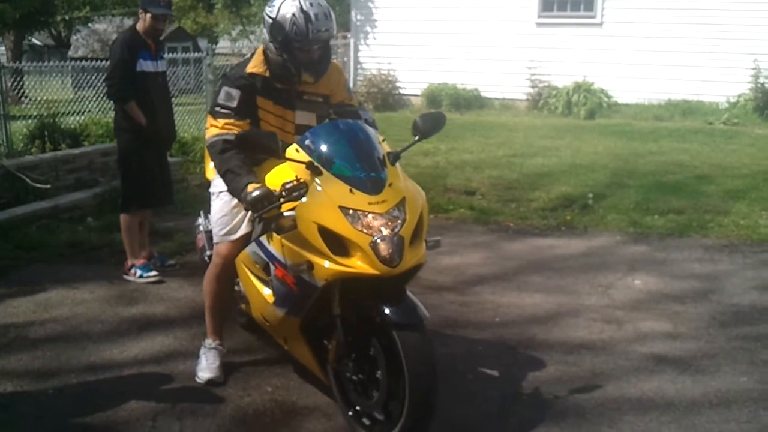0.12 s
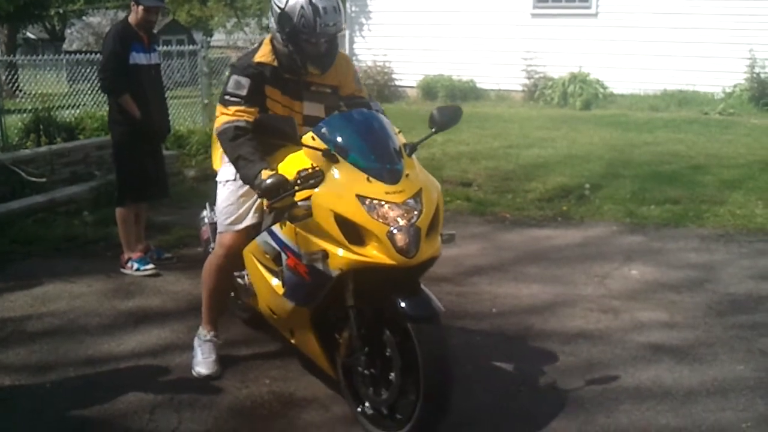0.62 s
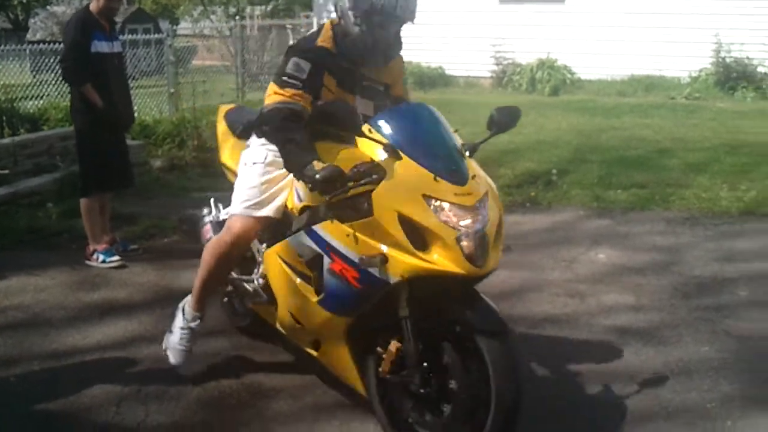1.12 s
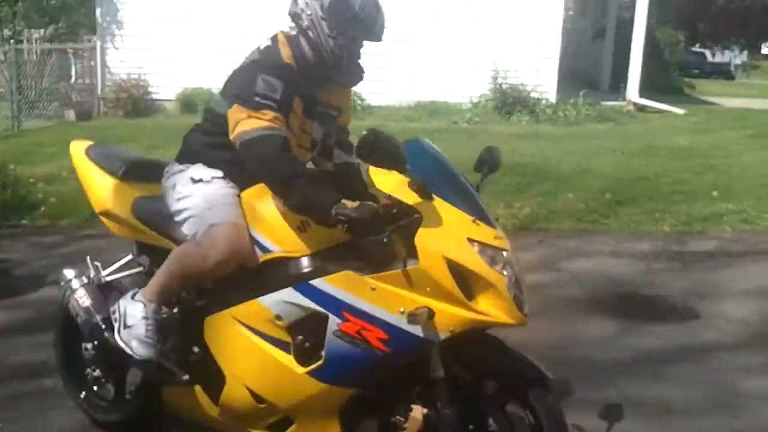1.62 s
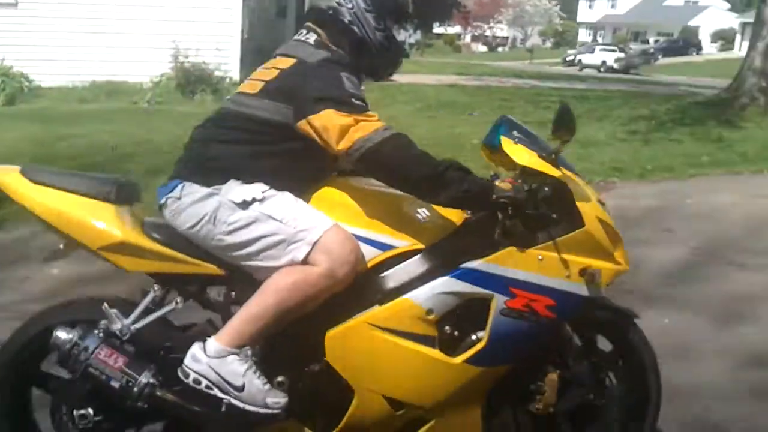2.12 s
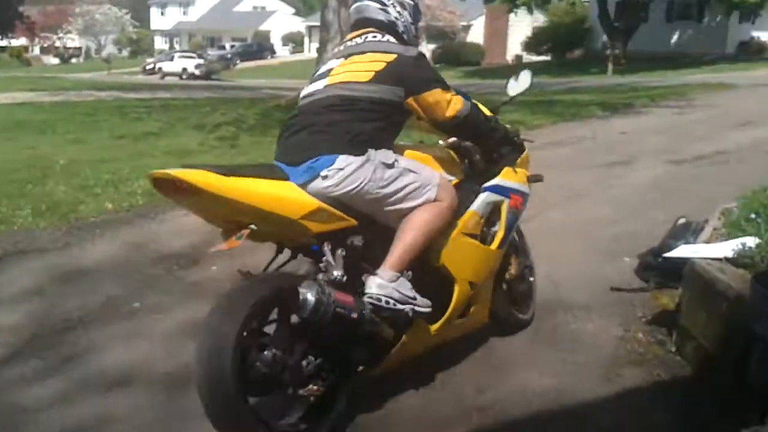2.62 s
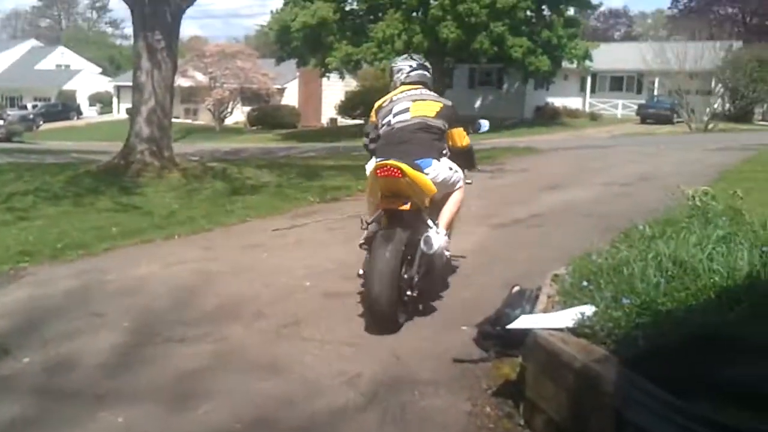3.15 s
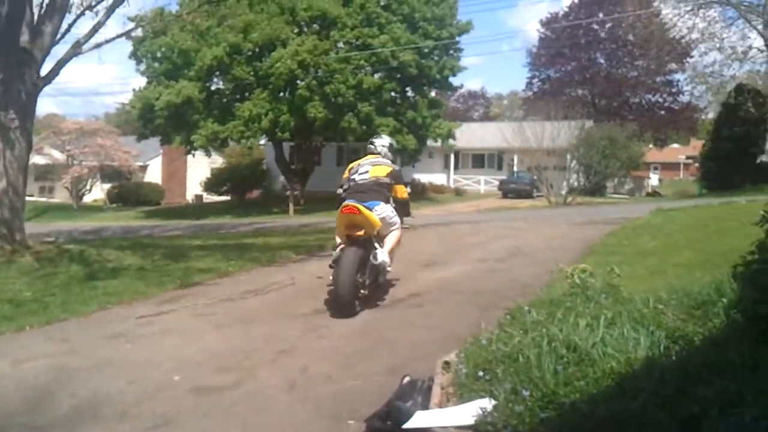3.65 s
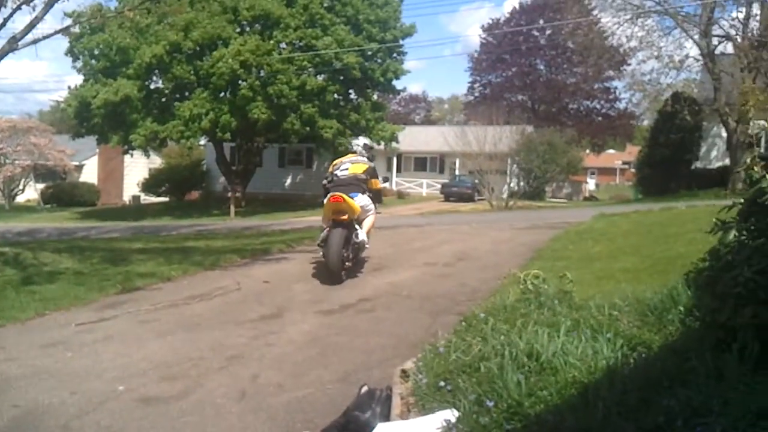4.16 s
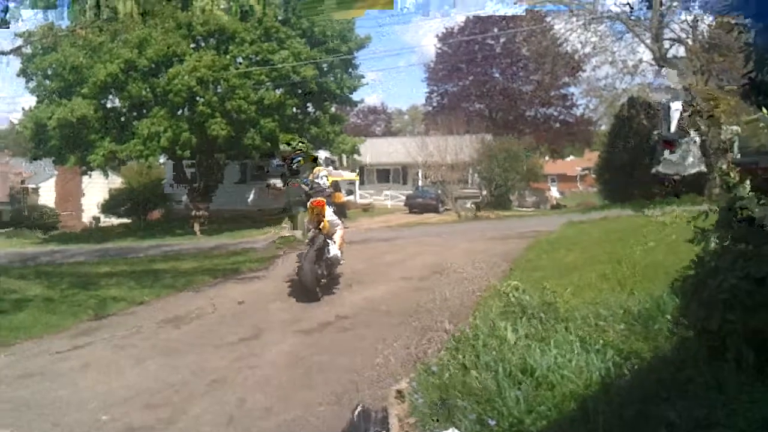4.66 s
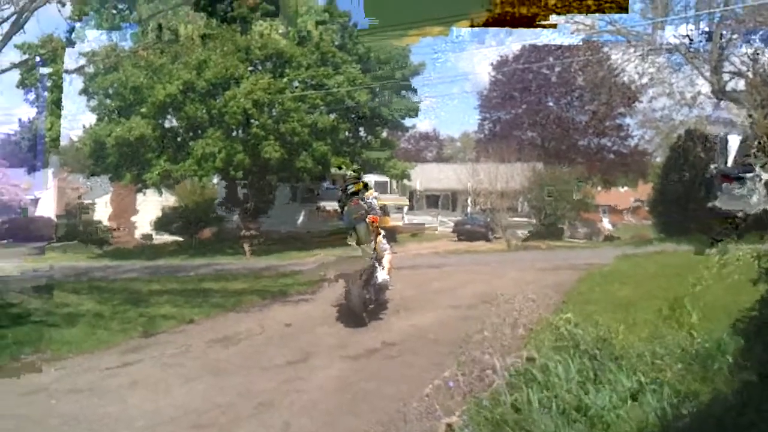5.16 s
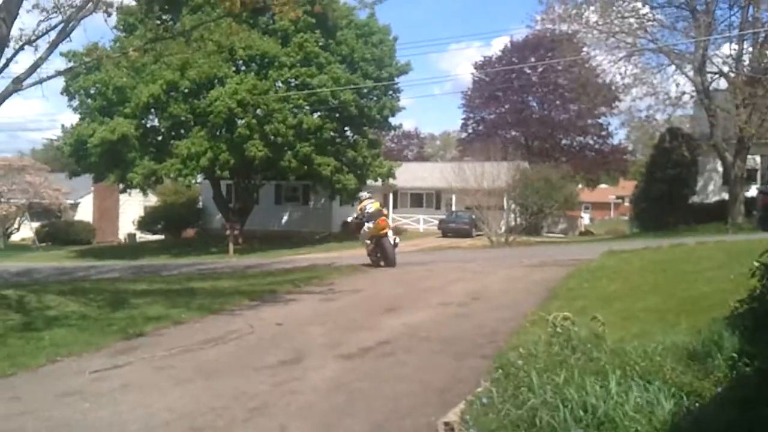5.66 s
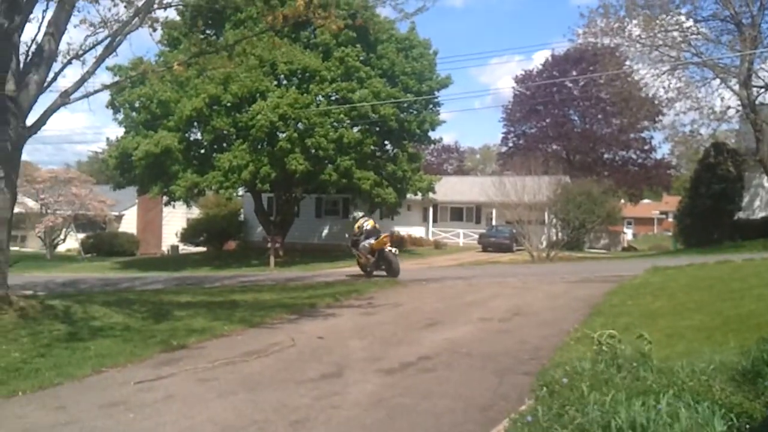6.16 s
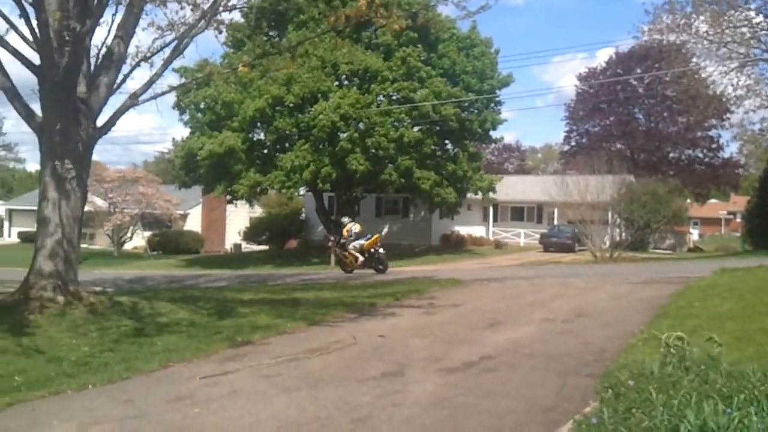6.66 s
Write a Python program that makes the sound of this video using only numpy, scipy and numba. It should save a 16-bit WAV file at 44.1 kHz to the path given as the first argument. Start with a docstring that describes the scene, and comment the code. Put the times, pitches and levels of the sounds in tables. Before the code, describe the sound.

Close, distorted motorcycle rev falls to a lumpy idle, then the bike pulls away down a driveway, blipping, popping and barking as wind thumps the microphone.

```python
"""Motorcycle blips its throttle and rides off

A four-cylinder sport motorcycle blips its throttle near a microphone, rolls past and rides off down a drive.
Timed firings ring the exhaust can and tailpipe, and gas rasps with each firing. Filtered noise makes
the gear whine, the buzz of a loose panel, the pops of late burning and the hiss of tyres and street.
House fronts echo the bike, wind buffets the microphone and the input stage clips.
"""
import sys
import numpy as np
from scipy import signal
from scipy.fft import rfft, irfft
from scipy.io import wavfile
from scipy.ndimage import uniform_filter1d
from numba import njit

SR = 44100
rng = np.random.default_rng(int(sys.argv[2]) if len(sys.argv) > 2 else 0)


def dump_mix(stems):
    """Bounce the given channels to the path in sys.argv[1] as a 16-bit WAV at rate SR."""
    frames = np.atleast_2d(stems).T  # one column per channel
    limited = np.clip(frames, -1, 1)  # hard clip at full scale
    pcm = np.round(limited * 32767).astype(np.int16)
    wavfile.write(sys.argv[1], SR, pcm)


def ratio_of_db(decibels):
    """Turn decibels (scalar or array-like) into linear amplitude factors; 0 dB maps to 1."""
    return 10 ** (np.asarray(decibels, float) / 20)


N = 298893

# Phase of the pressure pulse for each side the bike shows: front/rad, side/rad, behind/rad
LEAN = [0, 0, 2.3]


def curve(rows):
    """Join the points of a table with straight lines over time, one value a sample."""
    t, *columns = np.transpose(rows)
    return [np.interp(np.arange(N) / SR, t, column) for column in columns]


def side(values):
    """Pick a value for the side that the bike shows; the last one holds beyond."""
    # t/s, side shown (0 front, 1 side, 2 behind, 3 far and turning)
    aspect = [(0, 0), (1.3, 0), (1.8, 1), (2.7, 1), (3.45, 2), (5.3, 2), (6.0, 3), (6.78, 3)]
    return np.interp(curve(aspect)[0], np.arange(len(values)), values)


def facing(dbs):
    """Gain of a resonance for the side that the bike shows."""
    return ratio_of_db(side(dbs))


def spell(start_s, end_s, fade_s):
    """1 between two moments, fading in and out; each fade is halfway at its moment."""
    t = np.arange(N) / SR
    return np.clip(np.minimum(t - start_s, end_s - t) / fade_s + .5, 0, 1)


def walk(rate):
    """Random wandering: levels held for 1 / rate seconds, then smoothed; spread near 1."""
    size = int(SR / rate)
    held = np.repeat(rng.standard_normal(N // size + 1), size)
    return 0.81 * uniform_filter1d(uniform_filter1d(held, size), size)[:N]


def unit(x, hold_s=0.12):
    """Even out the loudness: bring the running rms to 1."""
    size = int(hold_s * SR)
    power = uniform_filter1d(uniform_filter1d(x ** 2, size), size)
    return x / np.sqrt(power + 1e-12)


@njit
def svf(x, hz, width):
    """Band-pass filter (state-variable) with a moving centre, gain 1 at the centre."""
    y, b, l = np.empty(len(x)), 0., 0.
    for i in range(len(x)):
        g, k = np.tan(np.pi * hz[i] / SR), width / hz[i]
        v = (b + g * (x[i] - l)) / (1 + g * (g + k))
        b, l, y[i] = 2 * v - b, l + 2 * g * v, k * v
    return y


def ring(x, modes):
    """Excite resonances that alternate in sign, as along a pipe."""
    out = 0
    for k, (hz, width, *dbs) in enumerate(modes):
        tone = svf(x, np.full(N, 1. * hz), 1. * width)
        out = out + (-1) ** k * facing(dbs) * tone
    return out


def colour(x, points):
    """Shape the spectrum by points of (f/Hz, gain/dB)."""
    hz, db = np.transpose(points)
    f = np.maximum(np.fft.rfftfreq(N, 1 / SR), 1)
    return irfft(rfft(x) * ratio_of_db(np.interp(np.log(f), np.log(hz), db)), N)


def street():
    """Tyres and street: a smooth, steady hiss of coloured noise under the engine."""
    # f/Hz, relative level per Hz/dB
    street_colour = [(200, -12), (600, -5.5), (1200, -3), (2500, -11.5), (5000, -12), (7000, -8.5),
                     (9000, -52.5)]
    return ratio_of_db(-42) * unit(colour(rng.standard_normal(N), street_colour), .5)


def wind():
    """Low eddies rumble on the microphone port; buffets jolt its diaphragm with slowing, fading swings."""
    # middle t/s, length/s, relative level/dB
    gusts = [(.12, 0.74, -19.5), (0.553, 0.066, -19.5), (0.874, .12, -43), (1.141, 0.072, -26.5),
             (2.009, 0.05, -15), (2.29, 0.34, -17.5), (2.967, .07, -17), (3.218, 0.07, -14.5),
             (3.588, 0.26, -20.5), (3.94, 0.22, -15), (4.29, 0.23, -13), (4.57, 0.054, -14),
             (4.736, 0.099, -12.5), (4.974, 0.29, -22), (5.188, 0.11, -22.5), (5.334, .05, -14.5),
             (5.558, 0.14, -27.5), (5.889, 0.045, -20.5), (6.306, 0.99, -30.5)]
    # onset t/s, level before fading and softening/dB
    buffets = [(3.658, -1), (3.698, -4), (3.756, 1.5), (3.789, -3), (3.819, -14), (3.836, 0), (4.208, -1),
               (4.247, -7), (4.358, -5), (4.409, -0.5), (4.743, -25)]
    calm_db, buffet_hz = -34.5, 60  # relative level between gusts; the first swing lasts 1 / buffet_hz
    t = np.arange(N) / SR
    eddies = colour(rng.standard_normal(N),
                    [(12, -53.0), (30, -22.5), (45, -12.5), (80, -22), (150, -13), (500, -28.5), (2000, -80)])
    strength = ratio_of_db(calm_db)
    for middle_s, length_s, db in gusts:
        strength = strength + ratio_of_db(db) * np.exp(-2 * ((t - middle_s) / length_s) ** 2)
    pushes = 0
    for start_s, db in buffets:
        progress = np.clip((t - start_s) * buffet_hz, 0, 4)
        # the square root makes each swing longer than the last
        pushes = pushes - ratio_of_db(db) * np.sin(2 * np.pi * np.sqrt(progress)) * np.exp(-progress / 1.2)
    soft = signal.sosfilt(signal.butter(2, 450, fs=SR, output="sos"), pushes)
    flutter = ratio_of_db(3.5 + 4.5 * walk(25))
    return strength * flutter * unit(eddies, 0.25) + soft


def panel(turns, throttle_db):
    """A loose panel is shaken once every four firings, harder with the throttle open."""
    # f/Hz, width/Hz, relative level/dB
    panel_modes = [(1010, 80, 0), (2320, 160, -21), (5000, 260, -23)]
    # from t/s, to t/s, level at 0 dB of throttle/dB
    panel_spells = [(4.059, 4.181, -27.5), (4.431, 5.06, -23.5), (5.054, 5.243, -29.5)]
    shake = np.exp(-(turns / 4 % 1) / 0.37) * rng.standard_normal(N)
    buzz = 0
    for hz, width, db in panel_modes:
        centre = np.full(N, 1. * hz)
        tone = svf(svf(shake, centre, 1. * width), centre, 130.0)
        buzz = buzz + ratio_of_db(db) * unit(tone, .2)
    loudness = sum(ratio_of_db(db) * spell(start_s, end_s, 0.071) for start_s, end_s, db in panel_spells)
    return loudness * ratio_of_db(0.65 * throttle_db) * buzz


def gears(hz):
    """Gear teeth: narrow, patchy whines of filtered noise that follow the engine speed."""
    # meshes per firing, width/Hz, from t/s, to t/s, level about which it wanders/dB
    teeth = [(63.5, 340, .76, 1.0, -42), (63.5, 320, 1.06, 1.3, -44), (63.5, 260, 1.3, 2.15, -39),
             (63.5, 300, 2.4, 2.66, -40), (80, 300, 1.12, 1.42, -43), (79, 300, 2.42, 2.66, -42),
             (14.3, 45, 6.42, 6.9, -42)]
    out = 0
    for meshes, width, start_s, end_s, db in teeth:
        mesh_hz = np.minimum(meshes * hz, 9000.)
        whine = svf(svf(rng.standard_normal(N), mesh_hz, 1. * width), mesh_hz, 1. * width)
        out = out + spell(start_s, end_s, .1) * ratio_of_db(db + 5 * walk(26)) * unit(whine, .3)
    return out


def pops():
    """Late burning in the pipe: short dull bursts of noise with a quick start."""
    # onset t/s, level before the rise and decay/dB
    pop_times = [(3.53, -19), (3.655, -20), (3.763, -18), (3.788, -20), (3.92, -18), (4.043, -19),
                 (4.211, -20), (4.415, -16), (4.743, -20)]
    rise_s, decay_s, width_hz = .002, .014, 600.
    t, centre = np.arange(N) / SR, np.full(N, 500.)
    shape = 0
    for start_s, db in pop_times:
        rise = np.clip((t - start_s) / rise_s, 0, 1)
        shape = shape + ratio_of_db(db) * rise * np.exp(-np.maximum(t - start_s, 0) / decay_s)
    noise = svf(svf(rng.standard_normal(N), centre, width_hz), centre, 2 * width_hz)
    return shape * unit(noise)


def firings(turns, late=.08, scatter_db=4.0, blowdown_s=.0007):
    """One rounded pulse a firing, early or late (in firings) and strong or weak as the charge burns."""
    count = np.arange(1, int(turns[-1]))
    chance = rng.standard_normal((len(count), 2))
    at = np.interp(count + late * chance[:, 0], turns, np.arange(N) * (1 - 2 / N))
    pulses = np.zeros(N)
    np.add.at(pulses, at.astype(int), ratio_of_db(scatter_db * chance[:, 1]))
    size = int(blowdown_s * SR)
    return uniform_filter1d(uniform_filter1d(pulses, size), size)


def orders(hz, turns, rough, modes, first, count, waver_db=3.0):
    """Steady part of the firings: multiples of their rate, weighted by the resonances; high ones lag."""
    # lag per multiple above the third, squared: front/rad, side/rad, behind/rad, far/rad
    spread_rad = [.08, .12, .08, .06]
    sparse = slice(None, None, 64)  # the weights change slowly, so every 64th sample is enough
    lean, spread = side(LEAN), side(spread_rad)
    gains = [facing(dbs)[sparse] for _, _, *dbs in modes]
    out = 0
    for k in range(first, count + 1):
        f = k * hz[sparse]
        power = 0
        for gain, (mode_hz, width, *_) in zip(gains, modes):
            power = power + (gain / (1 + (2 * (f - mode_hz) / width) ** 2)) ** 2
        weight = np.interp(np.arange(N), np.arange(N)[sparse], np.sqrt(power))
        weight = weight * ratio_of_db(waver_db * (1.8 + rough) * walk(20))
        out = out - weight * np.cos(2 * np.pi * k * turns - spread * (k - 3) ** 2 + lean)
    return unit(out)


def roughness():
    """How unevenly the charge burns, from 0 to 1: a base for the side shown, moved in marked spells."""
    # from t/s, to t/s, roughness 0-1
    burn_spells = [(0, .2, .55), (.62, 1.02, .75), (3.46, 3.86, .88), (4.21, 4.43, .78), (5.25, 5.36, .55),
                   (5.76, 5.92, .85)]
    # roughness with the throttle open: front, side, behind, far
    open_rough = [.3, .24, .28, .17]
    fade_s = .09
    on_load = side(open_rough)
    rough = on_load
    for start_s, end_s, target in burn_spells:
        rough = rough + (target - on_load) * spell(start_s - fade_s / 2, end_s + fade_s / 2, fade_s)
    return rough


def gas_jet(puff):
    """Rushing gas swells with each firing; noise rings at fixed pitches: hollow rasp, late buzz, faint whines."""
    # f/Hz, relative level per Hz/dB
    gas_colour = [(530, -53.5), (900, -10), (1010, -13), (1440, -8.5), (1670, -9.5), (3260, -12),
                  (4970, -13.5), (6150, -9), (7000, 6), (9100, -57), (15400, -120)]
    # noise ringing at fixed pitches: a hollow rasp, a late buzz and faint high whines
    # f/Hz, width/Hz, relative level from the front/dB, side/dB, behind/dB, far/dB
    jet_tones = [(1350, 210, -18, -3.5, -2.5, -3.5), (2222, 490, -13.5, -25, -10, -18),
                 (4950, 74, -17.5, -14, -11.5, -26.5), (6220, 110, -35.5, -25.5, -0.5, 11),
                 (4600, 61, -35, -30, -29.5, -6), (1100, 53, -34, -35.5, -16, 3.5)]
    jet = rng.standard_normal(N) * (1.0 + .5 * puff) * ratio_of_db(0.76 * walk(49))
    gas = unit(colour(jet, gas_colour), 0.22) + ratio_of_db(8) * ring(rng.standard_normal(N), jet_tones)
    return unit(gas, 0.19)


def levels(hz, throttle_db):
    """Each layer's dB from the side shown and the throttle; the two lowest tones also follow the speed."""
    # per layer: level from the front/dB, side/dB, behind/dB, far/dB, gain per dB of throttle/dB
    layers = dict(can=(-4.5, -4.5, -10, -7.5, 0.91), thump=(0, 3.5, -5, -3, 1.28),
              second=(-2, -1, -4.5, -3, 1.53), bark=(-16.5, -24.5, -10.5, -5, 2.15),
              gas=(-19, -17.5, -22, -23, 1.1751))
    # how well the pipe carries the lowest tones: firing rate f/Hz, thump/dB, tone at twice the rate/dB
    low_tones = [(42.4, -3.5, -21), (51.3, -15.5, -6), (66.5, -8, -3), (84, -9, 0.5), (115, -9.5, -6),
                 (141, -6, -2), (160, -6, -3.5), (209, 0.5, -18.5)]
    db = {name: side(row[:-1]) + row[-1] * throttle_db for name, row in layers.items()}
    at_hz, thump_db, second_db = np.transpose(low_tones)
    thump = db["thump"] + np.interp(np.log(hz), np.log(at_hz), thump_db)
    second = db["second"] + np.interp(np.log(hz), np.log(at_hz), second_db)
    return db["can"], thump, second, db["bark"], db["gas"]


def exhaust(hz, turns, can_db, thump_db, second_db, bark_db, gas_db):
    """Even and uneven firings ring the can and the tailpipe; a puff of rasp follows each firing."""
    # strength of the four firings of a cycle: level/dB
    cylinders_db = [0, -.8, .4, -.5]
    # low resonances: f/Hz, width/Hz, relative level from the front/dB, side/dB, behind/dB
    can_modes = [(128.2, 120, -6.5, -6, -9.5), (166.4, 116, 1.5, 0, 0), (257.8, 110, 0.5, -2, -3),
                 (331, 75.5, -3, -5, -4.5), (402, 53, -11.5, -10, -9.5)]
    # bark resonances: f/Hz, width/Hz, relative level from the front/dB, side/dB, behind/dB, far/dB
    pipe_modes = [(524.6, 67, 2.5, -11.5, 23.5, 13), (701, 180, 0.5, -5, -8.5, -0.5),
                  (835, 66, 2.5, 0.5, -15, -7), (1045, 346, -10, -19.5, -7.5, -1.5)]
    # weight of the tailpipe's turbulence against its steady tone: front/dB, side/dB, behind/dB, far/dB
    rattle_db = [9, 10, 2, -4]
    rough = roughness()
    even = np.sqrt(1 - rough ** 2)
    pulses = firings(turns)
    puff = unit(np.abs(svf(pulses, np.full(N, 30.), 150.0)), 0.15)
    flow = rng.standard_normal(N) * np.sqrt(hz / SR)  # as strong as the pulses at gain 1
    cylinder = ratio_of_db(np.interp(turns % 4, np.arange(5), cylinders_db + cylinders_db[:1]))
    # the crank hurries and lags a little, which blurs the high multiples first
    crank = turns + .09 * rough * walk(45)

    lean = side(LEAN)
    thump = -np.sqrt(2) * np.cos(2 * np.pi * crank + lean) * ratio_of_db(thump_db + 5.0 * rough * walk(30))
    second = -np.sqrt(2) * np.cos(4 * np.pi * crank + lean) * ratio_of_db(second_db + 1.0 * rough * walk(30))

    steady_can = orders(hz, crank, rough, can_modes, first=3, count=9)
    uneven_can = unit(ring(pulses + uniform_filter1d(flow, size=40), can_modes))
    can = even * steady_can - rough * uneven_can

    rattle = unit(ring(pulses + ratio_of_db(12.5) * (1.0 + puff) * flow, pipe_modes))
    steady_bark = orders(hz, crank, rough, pipe_modes, first=4, count=8)
    bark = even * steady_bark + (.5 + rough) * facing(rattle_db) * rattle

    tones = ratio_of_db(can_db) * can + thump + second + ratio_of_db(bark_db) * unit(bark)
    return cylinder * tones + ratio_of_db(gas_db) * gas_jet(puff)


def houses(x):
    """House fronts add three echoes whose delay grows as the bike draws away."""
    # delay at the start/ms, delay at the end/ms, level/dB
    echo_rows = [(21, 55, -16), (47, 90, -18), (83, 130, -20)]
    now = np.arange(N)
    out = x
    for start_ms, end_ms, db in echo_rows:
        delay = np.linspace(start_ms, end_ms, N) * SR / 1000
        out = out + ratio_of_db(db) * np.interp(now - delay, now, x, 0)
    return out


def scene():
    """Engine, pops, gears and panel with their echoes, the wind and the street."""
    # t/s, firing rate f/Hz, throttle effort/dB
    ride = [(0.0, 87.5, -3.5), (0.05, 116.2, -1), (0.1, 136.9, 0), (0.17, 114.9, -8.5), (0.2, 132.2, 0),
            (0.24, 162.5, 3.5), (0.3, 188.5, 4), (0.36, 202, 3.5), (0.45, 202.5, 0.5), (0.53, 195.8, 1),
            (0.62, 128.5, -4), (0.72, 77.2, -7), (0.81, 51.52, -10), (0.91, 41.78, -6.5),
            (0.96, 45.98, -10), (1.04, 55.13, -8.5), (1.09, 62.3, -6), (1.15, 67.08, -7),
            (1.19, 67.05, -6.5), (1.49, 49.33, -7), (1.64, 54.33, -4.5), (1.75, 51.35, -5.5),
            (2.24, 49.95, -4), (2.38, 52.58, -3), (2.51, 59.8, -4), (2.75, 68, -0.5), (2.81, 72.1, -2.5),
            (2.89, 70.76, -2), (3.04, 82.66, -2), (3.21, 93.5, -1.5), (3.26, 88.3, -3), (3.34, 98.83, -0.5),
            (3.42, 93.75, -7), (3.51, 67.8, -6.5), (3.61, 56.7, -9.5), (3.72, 51.2, -14.5),
            (3.85, 67.9, -12.5), (3.94, 104.2, -4.5), (3.96, 108.5, -5), (4.03, 98.05, -9),
            (4.1, 136.4, 0.5), (4.15, 164.2, -1.5), (4.19, 158, -9), (4.3, 122.5, -10), (4.42, 121, -12),
            (4.45, 142.6, 2), (4.5, 163.8, -2.5), (4.55, 151.9, -9.5), (4.63, 164.8, -1),
            (4.7, 138.2, -11.5), (4.76, 120.3, -8.5), (4.83, 139.4, -4.5), (4.93, 157.7, -6.5),
            (5.02, 154.8, -6), (5.15, 116.1, -7), (5.25, 87.4, -8.5), (5.32, 78.74, -12),
            (5.38, 83.6, -7.5), (5.53, 105.8, -6), (5.61, 111.4, -5), (5.68, 108.6, -8), (5.81, 65.45, -10),
            (5.87, 61.5, -13.5), (5.96, 88.36, -8), (6.14, 81.67, -8), (6.32, 87.74, -8), (6.55, 102.1, -8),
            (6.78, 114.2, -6)]
    hz, throttle_db = curve(ride)
    turns = np.cumsum(hz) / SR  # firings so far
    engine = exhaust(hz, turns, *levels(hz, throttle_db))
    bike = engine + pops() + gears(hz) + panel(turns, throttle_db)
    return (houses(bike) + wind() + street())[None]


def low_pass(x):
    """Removes everything above the highest recorded frequency."""
    return signal.sosfilt(signal.butter(12, 7730, fs=SR, output="sos"), x)


def record(dry):
    """The input drifts and clips flat, long overloads pull the gain down, the top is cut, it clips again."""
    # slow drift of the input's rest point: t/s, offset (1 is full scale)
    drift = [(0, -.04), (.85, -.1), (1.2, -.05), (2.2, -.01), (3.2, -.03), (3.6, -.09), (4.9, -.09),
             (5.2, -.15), (5.8, -.17), (6.78, -.13)]
    clip, knee = .7, 6  # clipping ceiling; a higher knee bends more sharply
    squeeze_from, squeeze_s = .47, .12  # rms where the gain starts to fall; averaging time
    top_hz, full = 7950, .71  # 62 dB down from top_hz up; the converter's limit
    drive = (dry + curve(drift)[0]) / clip
    flat = clip * drive / (1 + drive ** knee) ** (1 / knee)
    load = np.sqrt(uniform_filter1d(flat ** 2, int(squeeze_s * SR), axis=1))
    squeezed = flat * np.minimum(squeeze_from / load, 1) ** .7
    cut = signal.sosfilt(signal.cheby2(8, 62, top_hz, fs=SR, output="sos"), squeezed)
    return low_pass(np.clip(cut, -full, full))


dry = scene()
out = record(dry)
dump_mix(out)
```